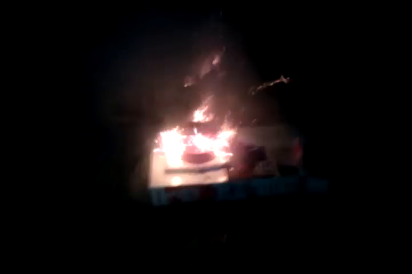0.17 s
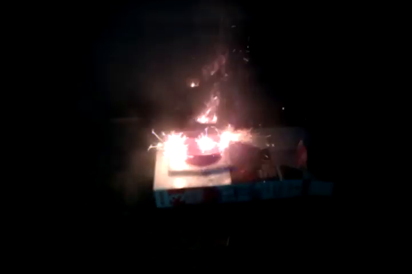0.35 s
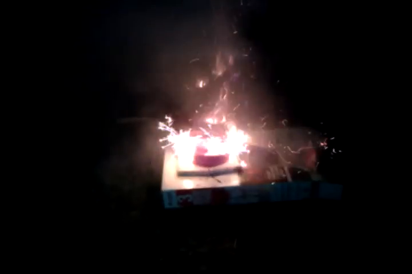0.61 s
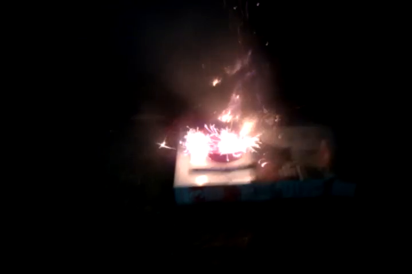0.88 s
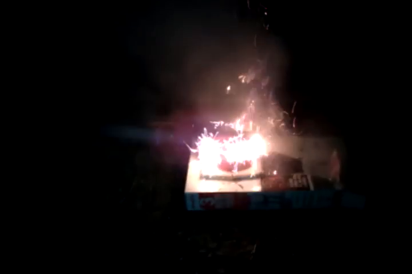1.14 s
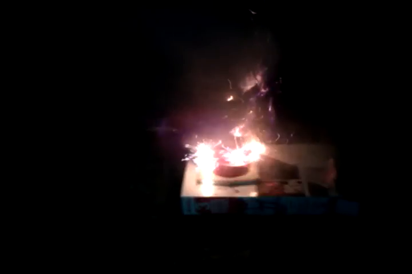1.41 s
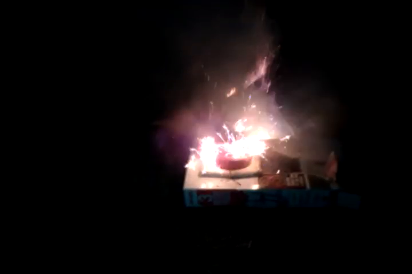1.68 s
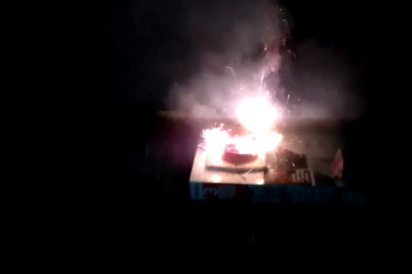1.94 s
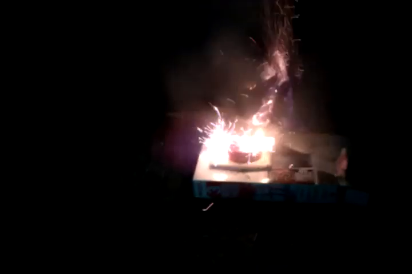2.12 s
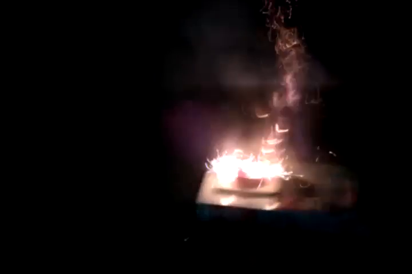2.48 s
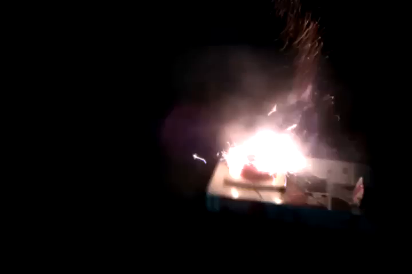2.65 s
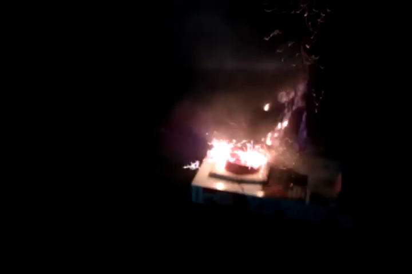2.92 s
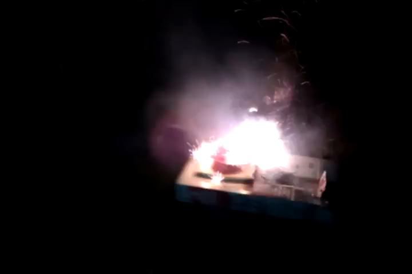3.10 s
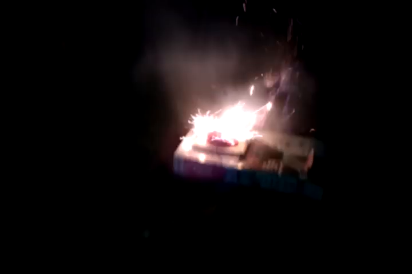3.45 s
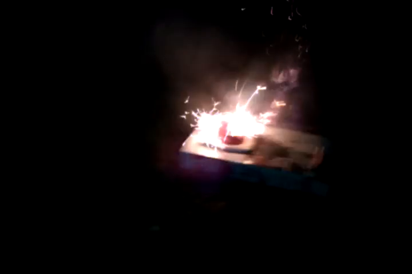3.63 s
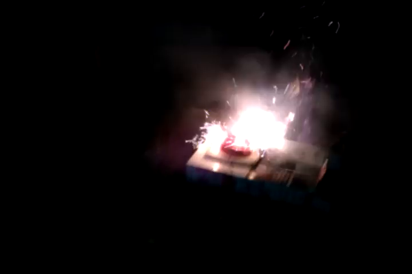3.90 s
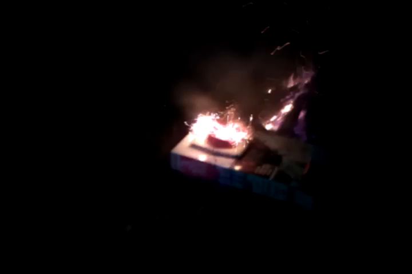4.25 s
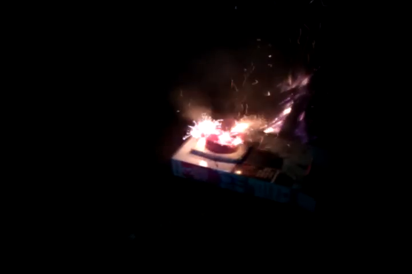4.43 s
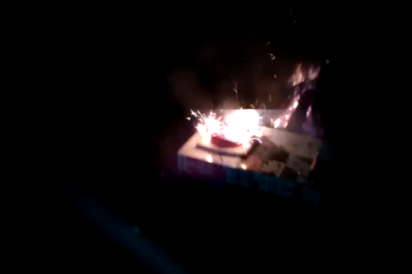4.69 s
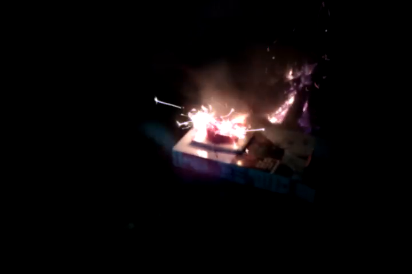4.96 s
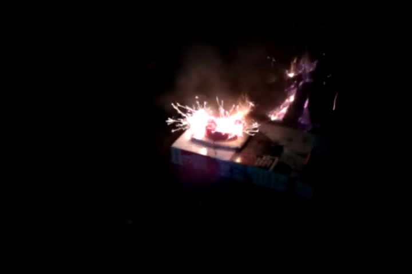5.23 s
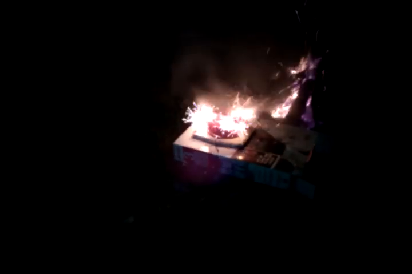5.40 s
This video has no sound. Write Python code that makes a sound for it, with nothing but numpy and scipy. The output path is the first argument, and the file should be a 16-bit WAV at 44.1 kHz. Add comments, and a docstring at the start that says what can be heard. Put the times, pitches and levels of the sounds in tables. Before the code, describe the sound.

Close firecrackers snap in irregular clusters, sometimes nearly doubled, for about five and a half seconds. The cracks are dry, hard and distorted, with little deep bass. Wall reflections and a grainy reverberant roar fill the gaps. The bangs thin out late, with one weak pop, then a final quick cluster. Outdoor residential setting, cheap overloaded microphone with a narrow speech band.

```python
"""A string of firecrackers burns on a cardboard box in a yard at night and goes off in uneven volleys.
Each bang is a burst of noise that overloads the microphone for about 15 ms; one cracker only pops.
A wall slaps back, a low boom rings between house fronts and a noise tail rolls through the neighbourhood.
The recorder keeps a narrow speech band, with thin bright ticks above it on some blasts."""
import sys
import numpy as np
from scipy import signal
from scipy.io import wavfile
from scipy.ndimage import uniform_filter1d, minimum_filter1d

SR = 44100
rng = np.random.default_rng(int(sys.argv[2]) if len(sys.argv) > 2 else 0)


def materialize(psi):
    """Save the field psi as 16-bit PCM at rate SR to the path in sys.argv[1].

    A 1-D psi becomes a single channel; in a 2-D psi each row is a channel.
    """
    bounded = np.clip(np.atleast_2d(psi).T, -1, 1)
    quanta = np.round(bounded * 32767).astype(np.int16)
    wavfile.write(sys.argv[1], SR, quanta)


N = 246078

# levels of a usual bang; the tail level also sets the far echoes
THUMP_DB, BODY_DB, CRACK_DB, WALL_DB, TAIL_DB = -22.1, -18.5, -13.6, -8.6, -21.0


def from_db(db):
    """Decibels to gain."""
    return 10 ** (np.asarray(db) / 20)


def rms_one(x):
    """Scale to rms 1."""
    return x / np.sqrt(np.mean(x ** 2) + 1e-20)


def band(x, low_hz, high_hz, order=2):
    """Causal band-pass."""
    edges_hz = [low_hz, min(high_hz, .45 * SR)]
    return signal.sosfilt(signal.butter(order, edges_hz, "band", fs=SR, output="sos"), x)


def add(track, s, sound):
    """Mix a sound into the track from time s [s] on, cut off at the track's ends."""
    start = round(s * SR)
    first, last = max(start, 0), min(start + len(sound), N)
    if last > first:
        track[first:last] += sound[first - start:last - start]


def burst(low_hz, high_hz, length, t60, shock, choke_db=0, size=3072):
    """A shock and its dense ground reflections in one register, held for a length [s], then falling."""
    t = np.arange(size) / SR
    early = np.maximum(1 - t / max(length, .002), 0)  # falls from 1 to 0 over the hold
    level_db = choke_db * early - 60 * np.maximum(t - length, 0) / t60
    pressure = rng.standard_normal(size) * from_db(level_db)
    pressure[0] += shock
    wave = band(pressure, low_hz, high_hz)
    # the whole burst carries the energy of rms 1 over the hold
    return wave * np.sqrt(np.sum(early > 0) / np.sum(wave ** 2))


# the overloaded microphone hardly gets louder with a bigger charge, it stays at its limit longer
BLAST_S, BLAST_S_PER_DB = .0146, .0003
BODY_FOLLOWS_CHARGE, BODY_FOLLOWS_THUMP = .3, .33  # dB per dB
# the brighter the bang, the higher its thump
THUMP_HZ, THUMP_OCTAVES_PER_DB = 335, .028
CHOKE_DB = -5.0
# every bang of the string, each against a usual one:
# (time [s], charge [dB], low thump [dB], bright crack [dB])
FIRECRACKERS = [(-.05, 2, 1, 2), (.031, 0, -4, 4), (.119, -2, -1, 2), (.221, 3, 2, 2), (.316, 2, 5, 0),
                (.539, 2, 1, 2), (.549, 1, -2, 0), (.588, 5, 0, 1), (.697, -6, -1, 0), (.785, -8, 0, -2),
                (1.139, -2, -3, -2), (1.203, 1, -3, -2), (1.339, -1, 0, 0), (1.358, 0, 4, -4),
                (1.609, 0, -4, 1), (1.662, 2, 2, 0), (1.793, -2, -2, 0), (1.826, -1, -1, -4),
                (1.879, 0, -3, 0), (2.087, 3, -5, 2), (2.21, 4, -2, 1), (2.224, 0, 0, 1),
                (2.291, -1, -1, 0), (2.443, 1, -2, 0), (2.6, 2, -1, 2), (2.708, -5, 7, -2),
                (2.869, 6, 3, 3), (2.884, 2, 1, 3), (3.107, 4, -2, 0), (3.189, 3, -4, 2), (3.258, 3, 1, 0),
                (3.628, -1, 3, -5), (3.834, 0, -2, 0), (3.888, 1, 2, 0), (3.953, -1, -3, -1),
                (4.03, 1, -5, 0), (4.062, 0, -2, -2), (4.127, -2, -4, -1), (4.317, -3, -1, -2),
                (4.587, -7, -4, -4), (4.738, -1, -2, 0), (4.888, 2, 5, -3), (5.358, -3, -4, 0),
                (5.457, -8, 3, -3), (5.491, 1, 5, 3), (5.52, 3, 0, 1)]


def blasts(puff_db=-13.7, box_db=-8.5, thump_width=1.453):
    """Each blast holds the microphone at its limit: a puff of gas, a hollow thump, a body and a crack."""
    out = np.zeros(N)
    for s, charge_db, thump_db, crack_db in FIRECRACKERS:
        length = BLAST_S + BLAST_S_PER_DB * charge_db
        thump_hz = THUMP_HZ * 2 ** (THUMP_OCTAVES_PER_DB * (crack_db - thump_db))
        body_db = BODY_FOLLOWS_CHARGE * charge_db + BODY_FOLLOWS_THUMP * thump_db
        puff = from_db(puff_db) * burst(62, 155, length, t60=.04, shock=4.0)
        box = from_db(box_db) * burst(198, 270, length, t60=.03, shock=16.0)  # the box drums along
        thump_low_hz = max(thump_hz / thump_width, 185)
        thump = burst(thump_low_hz, thump_hz * thump_width, length, t60=.033, shock=9.0)
        body = burst(500, 1400, length, t60=.03, shock=4.2)
        # the first pressure swing is heavy and chokes the treble, which swells back
        treble = burst(1580, 3930, length, t60=.02, shock=1.5, choke_db=CHOKE_DB)
        add(out, s, from_db(THUMP_DB + thump_db) * (puff + box + thump))
        add(out, s, from_db(BODY_DB + body_db) * body)
        add(out, s, from_db(CRACK_DB + crack_db) * treble)
    return out


# thin bright ticks, levels against the common tick gain: (time [s], peak level [dB])
BRIGHT_TICKS = [(0.0344, -24), (0.0423, -22), (0.1186, -28), (0.2324, -38), (0.3167, -33), (0.3267, -32),
                (0.5931, -23), (0.6014, -32), (2.4478, -51), (2.7077, -28), (2.8774, -20), (2.8824, -17),
                (2.8934, -26), (2.9014, -28), (3.1956, -40), (5.5014, -19), (5.5209, -39)]


def ticks(tick_db=3.0, ragged=0.65, size=256):
    """A click with sparse, quickly fading splinters makes a thin, ragged tick above the speech band."""
    out = np.zeros(N)
    fade = np.exp(-np.arange(size) / SR / .0014)
    for s, peak_db in BRIGHT_TICKS:
        strengths = ragged * rng.standard_normal(size)
        splinters = strengths * (rng.random(size) < .04) * fade
        splinters[0] = 1
        tick = band(band(splinters, 3000, 5700, order=1), 3900, 19000, order=3)
        add(out, s, from_db(peak_db + tick_db) * tick / np.abs(tick).max())
    return out


POP_S, POP_DB, POP_LENGTH_S = 4.669, -13, .002


def dry_pop(treble_db=-6.5):
    """One weak cracker: a single pressure swing, too weak to overload the microphone or wake echoes."""
    out = np.zeros(N)
    body = burst(480, 1500, POP_LENGTH_S, t60=.04, shock=7.0)
    treble = burst(1580, 3930, POP_LENGTH_S, t60=.025, shock=3.0)
    add(out, POP_S, from_db(POP_DB) * (body + from_db(treble_db) * treble))
    return out


def crack(low_hz, high_hz, t60, scatter, size=1024):
    """A shock front and the scatter of a rough surface right behind it; peak 1."""
    wave = scatter * rng.standard_normal(size) * from_db(-60 * np.arange(size) / SR / t60)
    wave[0] += 1
    wave = band(wave, low_hz, high_hz, order=1)
    wave = signal.sosfilt(signal.butter(4, 3600, fs=SR, output="sos"), wave)
    return wave / np.abs(wave).max()


# the slap follows charge and crack, dB per dB
SLAP_FOLLOWS_CHARGE, SLAP_FOLLOWS_CRACK = .15, .55
# the microphone drifts towards the wall: the slap comes sooner and grows
WALL_DELAY_S, WALL_DELAY_LOSS_PER_S, WALL_GAIN_DB_PER_S = .0363, .00066, .4
# weaker echoes from things farther off, against the tail level: (mean delay [s], mean level [dB])
FAR_ECHOES = [(0.042, -4.5), (0.05, -2.5), (.061, -11), (.082, -7.5), (0.107, 1.5), (.128, -3)]


def reflections(spread_db=3.0, wander_s=.0015, slap_body_db=-10.5):
    """The wall answers each bang with a bright slap; farther things add weaker, scattered ones."""
    out = np.zeros(N)
    for s, charge_db, _, crack_db in FIRECRACKERS:
        slap = crack(1700, 5000, t60=.012, scatter=.17)
        slap += from_db(slap_body_db) * crack(250, 1100, t60=.012, scatter=.2)
        slap_db = WALL_DB + WALL_GAIN_DB_PER_S * s
        slap_db += SLAP_FOLLOWS_CHARGE * charge_db + SLAP_FOLLOWS_CRACK * crack_db
        wall_delay = WALL_DELAY_S - WALL_DELAY_LOSS_PER_S * s
        add(out, s + wall_delay, from_db(slap_db) * slap)
        for delay, level_db in FAR_ECHOES:
            echo_db = TAIL_DB + charge_db + level_db + spread_db * rng.standard_normal()
            echo = from_db(echo_db) * crack(1100, 5400, t60=.0096, scatter=.18)
            add(out, s + delay + wander_s * rng.standard_normal(), echo)
    return out


BOOM_HZ, BOOM_T60_S = 235, 0.11
# low boom thrown to and fro between house fronts, against the boom level:
# (delay [s], mean level [dB])
BOOM_RETURNS = [(.004, 0), (0.033, -3.5), (0.097, -9.5), (0.187, -18.5), (0.277, -27)]


def boom(boom_db=-11.0, spread_db=1.5, size=8192):
    """Each return of the low flutter is a short, hollow sine ring that follows the thump of its bang."""
    out, t = np.zeros(N), np.arange(size) / SR
    swell = (1 - np.exp(-t / .00067)) * from_db(-60 * t / BOOM_T60_S)
    for s, _, thump_db, _ in FIRECRACKERS:
        for delay, level_db in BOOM_RETURNS:
            pitch = BOOM_HZ * (1 + .073 * rng.standard_normal())
            ring_db = THUMP_DB + thump_db + level_db + boom_db + spread_db * rng.standard_normal()
            ring = np.sin(2 * np.pi * (pitch * t + rng.random()))
            add(out, s + delay, from_db(ring_db) * swell * ring)
    return out


# a heavy thump also fills the low end of the rolling tail
TAIL_FOLLOWS_THUMP, TAIL_THUMP_BELOW_HZ = .45, 900


def echo_power(hz, t60, near_share=0.3, near_s=.016, far_s=.036):
    """Summed power of all bangs' echoes around one pitch: the yard answers first, then the houses."""
    fired = np.zeros(N + 2 * SR)  # starts 1 s early, for bangs before the start
    follows_thump = TAIL_FOLLOWS_THUMP / (1 + (hz / TAIL_THUMP_BELOW_HZ) ** 2)
    for s, charge_db, thump_db, _ in FIRECRACKERS:
        power = from_db(TAIL_DB + charge_db + follows_thump * thump_db) ** 2
        fired[round((s + 1 + near_s) * SR)] += near_share * power
        fired[round((s + 1 + far_s) * SR)] += (1 - near_share) * power
    kept_per_sample = from_db(-60 / (t60 * SR)) ** 2
    return signal.lfilter([1], [1, -kept_per_sample], fired)[SR:SR + N]


def drift(per_s):
    """Smooth chance with a spread of 1, drawn anew per_s times a second."""
    knots = rng.standard_normal(N // 10)
    return rms_one(np.interp(np.arange(N) / SR * per_s, np.arange(len(knots)), knots))


NIGHT_DB = -54.5  # steady hiss under the tail, before the tail's gains
# colour and late decay of the rolling tail:
# (frequency [Hz], relative level per Hz [dB], late t60 [s])
TAIL_COLOUR = [(40, -25, 1.0), (90, -13, 0.7), (150, -16.5, .95), (236, -12.5, 0.63), (330, -10, 0.8),
               (600, -4, 0.88), (1080, -2, 0.88), (1730, -0.7, 1.03), (2600, 5.5, 0.7), (3200, 0, 0.64),
               (3900, 3.5, 0.71)]


def rolling_tail(tail_gain_db=-1.1, early_share=0.58, early_t60=0.35, grain_db=1.8, patchy_db=1.76):
    """Countless small echoes as lumpy bands of noise: a quick early fall, then a slower roll."""
    edges = np.geomspace(30, 4600, 19)
    log_centres = np.log(edges[1:] * edges[:-1]) / 2
    table_hz, table_db, table_t60 = np.transpose(TAIL_COLOUR)
    gains = from_db(np.interp(log_centres, np.log(table_hz), table_db)) * np.sqrt(np.diff(edges))
    gains = gains / np.linalg.norm(gains[:-1])  # all bands but the top one sum to power 1
    t60s = np.interp(log_centres, np.log(table_hz), table_t60)
    out = np.zeros(N)
    for low, high, gain, t60 in zip(edges, edges[1:], gains, t60s):
        hz = np.sqrt(low * high)
        early = early_share * echo_power(hz, early_t60)
        late = (1 - early_share) * echo_power(hz, t60)
        power = early + late + from_db(NIGHT_DB) ** 2
        hiss = rms_one(band(rng.standard_normal(N), low, high))
        out += gain * np.sqrt(power) * hiss * from_db(patchy_db * drift(70))
    return out * from_db(tail_gain_db + grain_db * drift(450))


def scene():
    """Blasts, the pop, their echoes and the roll of the neighbourhood at one microphone."""
    return (blasts() + dry_pop() + reflections() + boom() + rolling_tail())[None]


FULL_SCALE = .73  # limiter ceiling
SPEECH_BAND_HZ, FILTER_STOP_HZ, CUTOFF_HZ = 3440, 5400, 16000


def record(dry, overload=1.0):
    """The microphone overloads, the speech band is kept, a fast limiter holds peaks; ticks go on top."""
    squashed = dry / (1 + (dry / overload) ** 8) ** (1 / 8)
    narrow = signal.sosfilt(signal.cheby1(8, .5, SPEECH_BAND_HZ, fs=SR, output="sos"), squashed)
    narrow = signal.sosfilt(signal.cheby2(12, 60, FILTER_STOP_HZ, fs=SR, output="sos"), narrow)
    # the gain dips around each peak and is smoothed twice
    gain = minimum_filter1d(FULL_SCALE / np.maximum(np.abs(narrow), FULL_SCALE), size=89)
    limited = narrow * uniform_filter1d(uniform_filter1d(gain, size=45), size=45)
    return signal.sosfilt(signal.cheby2(12, 70, CUTOFF_HZ, fs=SR, output="sos"), limited + ticks())


dry = scene()
out = record(dry)
materialize(out)
```